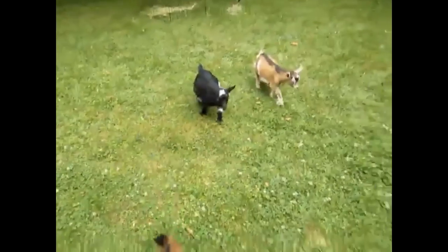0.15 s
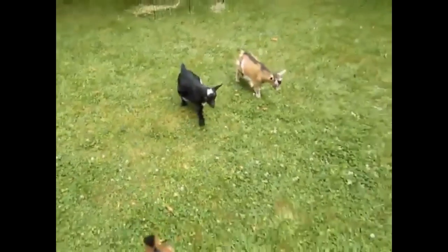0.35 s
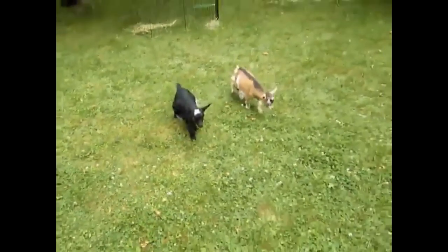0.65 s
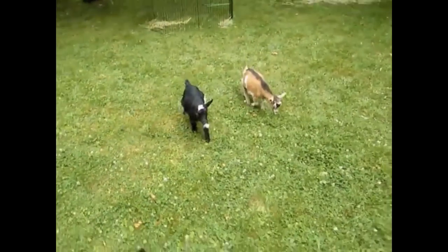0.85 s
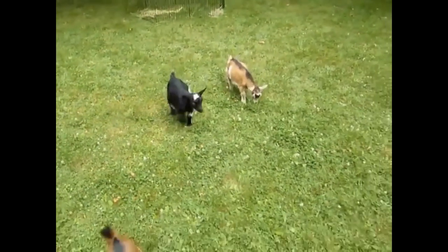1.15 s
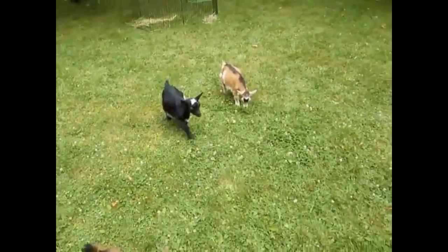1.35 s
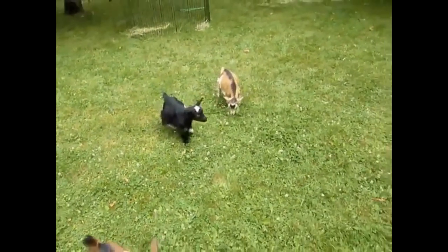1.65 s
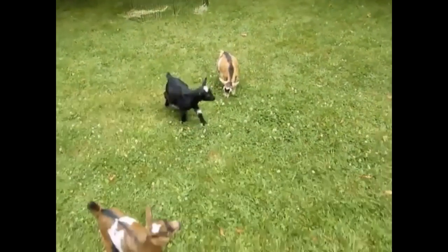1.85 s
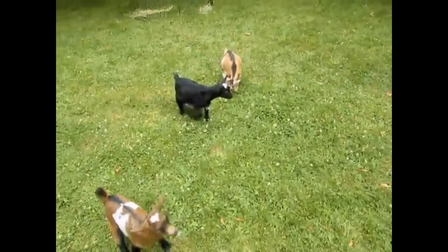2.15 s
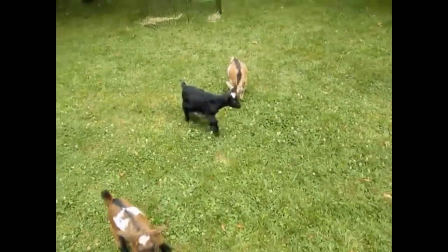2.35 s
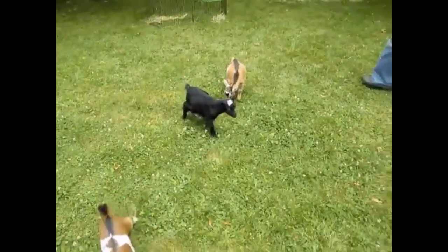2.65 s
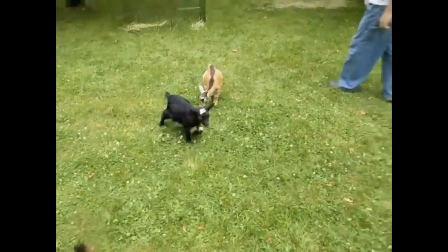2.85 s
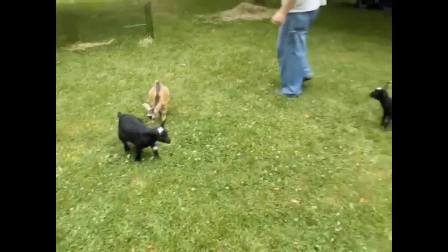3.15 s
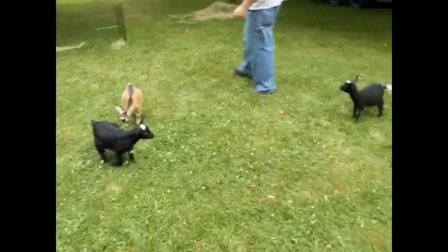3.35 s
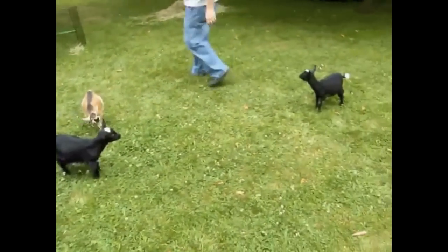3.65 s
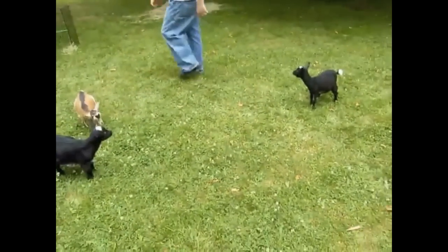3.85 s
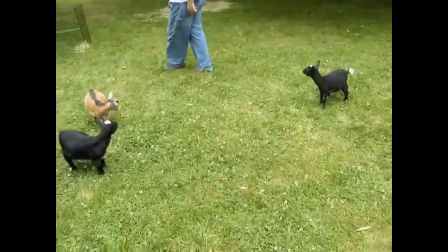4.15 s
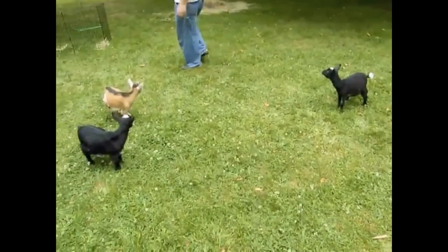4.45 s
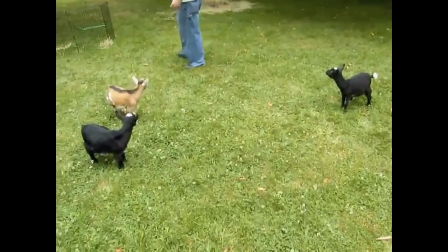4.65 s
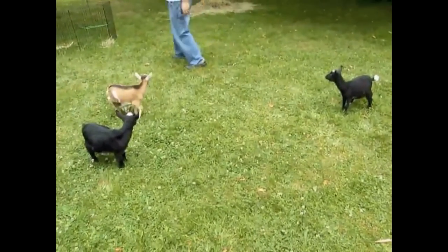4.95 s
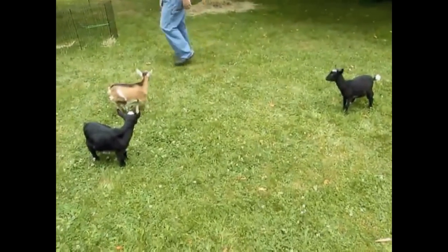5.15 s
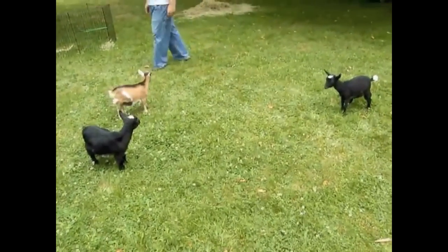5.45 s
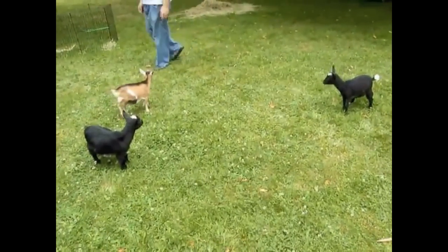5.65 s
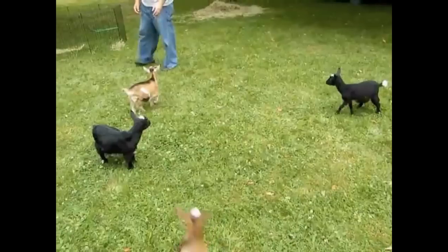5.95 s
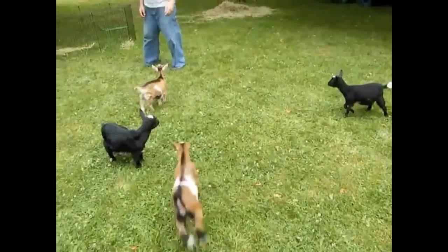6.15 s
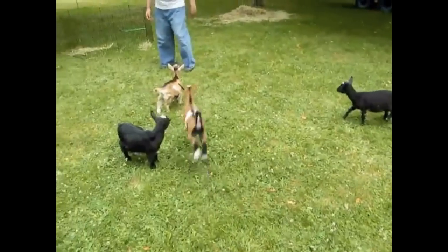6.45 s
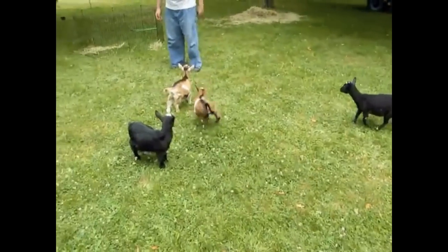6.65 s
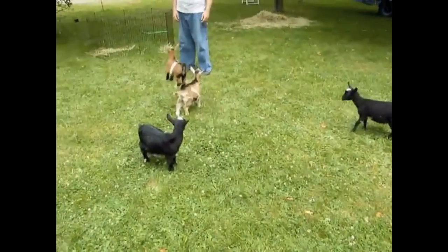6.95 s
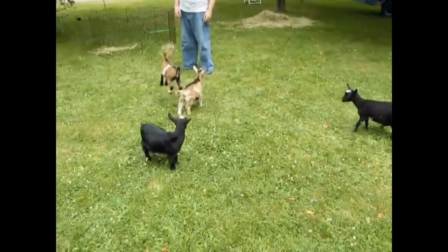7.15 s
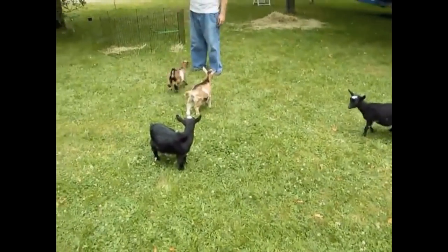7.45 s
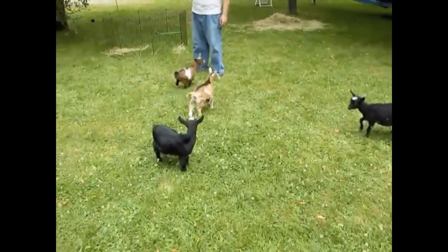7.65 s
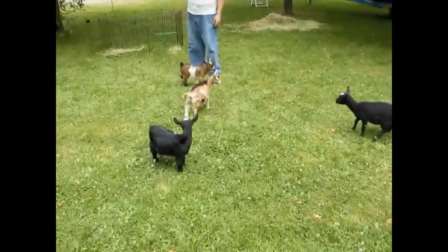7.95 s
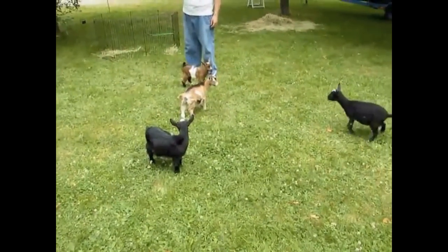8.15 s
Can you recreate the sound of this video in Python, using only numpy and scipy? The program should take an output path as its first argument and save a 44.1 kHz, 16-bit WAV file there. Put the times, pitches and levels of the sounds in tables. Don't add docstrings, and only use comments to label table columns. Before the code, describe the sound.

Goat kids in a yard bleat in quick pulsing bursts, each voice different: close and nasal, open-mouthed, thin, shrill and tight. Calls start soft, peak in the middle and end with a strong quavering bleat and two short nasal notes. Early crackles and clicks, later hoof thuds, falling bird chirps and low wind bumps surround them. The open-air sound is slightly dull and gritty, from a cheap handheld microphone, with distant engine and traffic wash.

```python
import sys
import numpy as np
from scipy import signal
from scipy.fft import rfft, irfft
from scipy.io import wavfile
from scipy.ndimage import uniform_filter1d

SR = 44100
rng = np.random.default_rng(int(sys.argv[2]) if len(sys.argv) > 2 else 0)


def master(y):
    cut = np.clip(np.atleast_2d(y).T, -1, 1)
    pcm = np.round(cut * 32767)
    wavfile.write(sys.argv[1], SR, pcm.astype(np.int16))


def invert_db(x):
    u = np.asarray(x, float) / 20
    return 10 ** u


N = 366030


def evened(x):
    return x / np.sqrt(np.mean(x ** 2) + 1e-20)


def read(points, hz):
    f, value = np.transpose(points)
    return np.interp(np.log(hz + 1), np.log(f + 1), value)


def at_time(points, s):
    return np.interp(s, *np.transpose(points))


def add(mix, s, sound):
    part = mix[max(round(s * SR), 0):][:len(sound)]
    part += sound[:len(part)]


def wobble(count, ms):
    size = max(round(ms * SR / 1000), 2)
    noise = rng.standard_normal(count)
    return evened(uniform_filter1d(uniform_filter1d(noise, size), size))


def resonate(x, hz, width):
    turn = np.exp(2j * np.pi * np.cumsum(hz * np.ones(len(x))) / SR)
    r = np.exp(-np.pi * width / SR)
    return 2 * (turn * signal.lfilter([1 - r], [1, -r], x / turn)).real


def band(x, hz, width):
    return evened(resonate(resonate(x, hz, width), hz, width))


def coloured(points, patchy_db, size=1024):
    frames = 4 * N // size + 5
    hz = np.fft.rfftfreq(size, 1 / SR)
    a, b, patches = rng.standard_normal((3, len(hz), frames))
    patches = uniform_filter1d(patches, size=20, axis=0)
    patches = evened(uniform_filter1d(patches, size=12, axis=1))
    z = (a + 1j * b) * invert_db(read(points, hz)[:, None] + patchy_db * patches)
    return evened(signal.istft(z, nperseg=size, noverlap=3 * size // 4)[1][:N])


def echoes(x, db, t60):
    t = np.arange(SR // 2) / SR
    signs = rng.choice([-1., 1.], len(t))
    sparse = (rng.random(len(t)) < .05) * (t > .006)
    taps = signs * sparse * invert_db(-60 * t / t60)
    return x + invert_db(db) * signal.fftconvolve(x, taps / np.linalg.norm(taps))[:N]


# time_s, level_db
GUSTS = [(0, -37.5), (1.04, -43.5), (1.25, -28), (1.76, -48.5), (2.19, -35.5), (2.84, -61), (3.03, -29.5),
         (3.37, -46.5), (5.99, -46.5), (6.42, -39.5), (6.66, -58), (8.3, -43.5)]
# time_s, change_db
ENGINE_LOAD = [(0, -4), (.23, -1), (1.04, -3.5), (1.25, 2), (1.76, -6.5), (2.3, -1), (3.03, 3), (3.37, -11),
               (3.6, 0), (5.52, 1), (5.99, -6), (6.7, 7), (8.3, 8)]
# time_s, change_db
STIR = [(0, 1), (.23, 6.5), (1.251, -2), (1.76, 4.5), (2.449, -0.6), (2.84, 6), (3.1, -1.5), (3.51, 4),
        (5.52, -1.5), (5.99, 5), (6.42, -1.5), (8.3, 0.5)]
# centre_hz, width_hz, level_db
DRONES = [(55.8, 12.3, 2.5), (112.2, 23, -25), (470, 17, -15), (1078, 200, -16)]
# frequency_hz, level_db (per Hz)
TRAFFIC = [(44, -33.5), (75, -4.5), (190, -17), (243, -15.5), (399, -18), (461, -15), (590, -18.5),
           (945, -16), (1470, -23), (1700, -25.5), (2210, -48), (3740, -120)]
# frequency_hz, level_db (per Hz)
HISS = [(760, -9), (1300, -23), (1830, -1), (2000, -1.5), (3210, -4), (3830, -4.5), (4370, -6.5),
        (5500, -10), (7150, -42.5), (12100, -120)]


def air():
    t = np.arange(N) / SR
    stir_db = at_time(STIR, t)
    wind_colour = [(4, -16.5), (12, -3.0), (30, -1.0), (60, -8.5), (110, -15.5), (200, -30.5), (400, -87.5)]
    wind_db = at_time(GUSTS, t) + 2.1 * wobble(N, 60)
    wind = invert_db(wind_db) * coloured(wind_colour, 1.2, size=4096)
    drones = sum(invert_db(db) * band(rng.standard_normal(N), hz, width) for hz, width, db in DRONES)
    engine = invert_db(-44 + at_time(ENGINE_LOAD, t)) * drones
    traffic_db = -44 + 0.7448 * t + 0.39 * stir_db
    traffic = invert_db(traffic_db) * coloured(TRAFFIC, 1.85, size=2048)
    leaves = invert_db(-46.5 + stir_db) * coloured(HISS, 2.3)
    return wind + engine + traffic + leaves


def low_pushes(rows, rise):
    out = np.zeros(N)
    for s, db, hz, cycles in rows:
        u = np.arange(round(2.5 * cycles / hz * SR)) / SR * hz / cycles
        swell = 2.48 * (1 - np.exp(-u / rise)) * np.exp(-2.2 * u ** 2)
        add(out, s, invert_db(db) * swell * np.sin(2 * np.pi * cycles * u * (1 - 0.038 * u)))
    return out


# start_s, peak_db, pitch_hz, length_cycles
PUFFS = [(0.004, -17.5, 50, 1.6), (2.27, -27, 52, 2.5), (2.97, -23.5, 60, 1.7), (0.081, -21, 45.5, 2.6),
         (0.255, -16.5, 51.7, 3.1), (0.43, -24, 50, 2.6), (0.521, -25.5, 51.3, 3),
         (0.794, -25.5, 53.8, 3.4), (1.107, -22.5, 47, 2.2), (1.181, -21.5, 61.9, 2.5),
         (2.011, -26, 40.4, 2.3), (2.177, -33, 53.8, 1.7), (3.007, -15, 43.1, 0.87), (3.538, -25, 50, 2.5),
         (4.848, -27, 24.6, 0.93), (6.191, -29.5, 78.1, 2.6), (6.451, -29, 56, 3.1),
         (6.542, -24, 59.2, 0.7), (7.19, -35, 59.2, 2), (7.339, -25, 61.9, 1.2), (8.035, -31, 37.4, 3.2)]


def wind_puffs():
    return low_pushes(PUFFS, rise=0.55)


# start_s, peak_db, ring_hz, fall_by_60_db_ms
TICKS = [(.046, -31, 900, 10), (.072, -21, 4500, 4), (.148, -25, 2300, 10), (.239, -20, 1170, 13),
         (3.766, -25, 1200, 8), (4.985, -23.5, 2700, 6), (.395, -19, 4100, 12), (.418, -21, 4000, 14),
         (.466, -29, 600, 14), (.736, -33, 1200, 9.1), (0.789, -21, 1040, 10), (2.525, -17.5, 930, 10),
         (2.526, -21, 1900, 6.4), (2.615, -21, 1300, 6), (3.378, -26, 2570, 6), (3.724, -24, 1200, 5.4),
         (3.975, -26, 700, 6), (3.976, -24, 2980, 10), (3.996, -26, 3300, 6)]


def ticks():
    out, t = np.zeros(N), np.arange(900) / SR
    for s, db, hz, ms in TICKS:
        ring = np.sin(2 * np.pi * hz * t) + .3 * rng.standard_normal(len(t))
        add(out, s, invert_db(db - 60000 * t / ms) * ring)
    return out


# centre_s, level_db, length_ms, centre_hz
RUBS = [(.147, -31.5, 19, 2400), (.243, -25, 13, 1130), (.28, -37, 50, 597), (.82, -36.5, 65, 1080),
        (.285, -44, 47, 1647), (.337, -32, 77, 2750), (.34, -34.5, 64, 481), (.429, -35.5, 107, 2200),
        (.44, -30.5, 43, 517), (1.052, -42.5, 136, 1800), (1.379, -43, 102, 1650), (3.978, -34, 23, 420),
        (4.001, -37.5, 82, 2710)]
# centre_s, level_db, centre_hz
SNAPS = [(0.251, -22, 1930), (0.253, -28.5, 2600), (0.258, -29.5, 5100), (1.703, -37, 4300),
         (3.338, -42, 3900), (3.351, -36, 650), (3.381, -32, 4400), (3.728, -42, 3520), (4.987, -38, 3300),
         (6.611, -36.5, 3970), (6.645, -37, 3470), (6.735, -35.5, 3580)]
# centre_s, level_db, length_ms
SWISHES = [(.375, -36, 100), (.43, -29.5, 70), (.6, -46.5, 63), (0.708, -40.5, 37), (0.802, -36, 31),
           (.869, -39.5, 93), (1.533, -39.5, 44), (1.615, -45.5, 46), (1.755, -42.5, 26), (2.101, -43, 45),
           (2.601, -45.5, 35), (3.299, -43, 45), (4.681, -45, 30), (5.81, -46, 43), (6.624, -40, 20),
           (7.372, -49.5, 57)]


def rustles():
    out = np.zeros(N)
    rubs = [(s, db, ms, hz, 0.72 * hz) for s, db, ms, hz in RUBS]
    snaps = [(s, db, 9.4, hz, 0.47 * hz) for s, db, hz in SNAPS]
    swishes = [(s, db, ms, 4100, .26 * 4100) for s, db, ms in SWISHES]
    for s, db, ms, hz, width in snaps + swishes + rubs:
        u = np.linspace(-1.5, 1.5, round(3 * ms * SR / 1000))
        sudden = u * np.where(u < 0, 1.3, .9)
        crackle = rng.standard_normal(len(u)) * invert_db(2.0 * wobble(len(u), 2.1))
        burst = band(crackle, hz, width) * .5 ** (4 * sudden ** 2)
        add(out, s - 1.5 * ms / 1000, invert_db(db) * burst)
    return out


# start_s, length_s, level_db, from_hz, to_hz
WHISTLES = [
    (0.564, 0.16, -43.5, 3380, 3380),
    (1.7, 0.13, -41.5, 2750, 2490),
    (1.822, 0.1, -41.5, 3060, 3180),
    (1.91, .05, -45.5, 2600, 2610),
    (4.435, 0.072, -42, 2400, 2380),
    (6.79, .07, -43, 3000, 2780),
    (6.895, .065, -43, 3200, 3600),
]
# start_s, length_s, level_db, from_hz, to_hz
WARBLES = [
    (2.924, 0.2, -42.5, 3390, 3264),
    (4.275, 0.13, -40, 2840, 2800),
    (6.845, .085, -42, 2650, 2750),
    (6.928, .035, -42, 3500, 2800),
    (6.95, .045, -42, 2750, 2750),
    (6.965, .035, -44, 3300, 3300),
    (8.176, 0.068, -42, 2550, 2730),
]


def far_birds():
    out = np.zeros(N)
    calls = [(row, 1) for row in WARBLES] + [(row, .4) for row in WHISTLES]
    for (s, length, db, from_hz, to_hz), shake in calls:
        hz = np.linspace(from_hz, to_hz, round(length * SR))
        count = len(hz)
        flutter, wander = .034 * wobble(count, 3.6), .018 * wobble(count, 21)
        hz = hz * (1 + shake * (flutter + wander))
        tone = np.sin(2 * np.pi * np.cumsum(hz) / SR)
        level_db = db + np.linspace(0, -5.5, count) + 2.7 * wobble(count, 17)
        add(out, s, invert_db(level_db) * tone * signal.windows.tukey(count, .4))
    return echoes(out, -0.5, 0.069)


def stack(part_db, pitch, breath, spread):
    k = np.arange(1, 17)[:, None]
    fuzz = 1 + breath * np.sqrt(k) * np.array([wobble(len(pitch), 3) for _ in k])
    waves = np.cos(2 * np.pi * k * np.cumsum(pitch) / SR - spread * k ** 2)
    return np.sqrt(2) * (invert_db(part_db) * fuzz * waves).sum(0)


USUAL_DB = -28


def syllables(rows, throat, glide_hz, glide_hz_per_db, bright_db, bright_db_per_db,
              facing=((0, 0),), lips=((0, 0),), *, arch, flat, blunt, skew, lead_db=0, early=0, outlast=1):
    out = np.zeros(N)
    k = np.arange(1, 17)[:, None]
    for s, db, ms, hz, *mouth in rows:
        effort_db = db - USUAL_DB
        glide = glide_hz + glide_hz_per_db * effort_db
        edge_db = bright_db + bright_db_per_db * effort_db + at_time(facing, s)
        u = np.linspace(-1.5, 1.5, round(3 * ms * SR / 1000))
        bent = u * (1 + skew * np.sign(u))
        sag = .28
        fall = sag * np.tanh(arch * abs(bent + early) ** flat / sag)
        pitch = (hz + glide * np.tanh(u)) * (1 - fall) * (1 + .003 * wobble(len(u), 4.8))
        upper = k * pitch > 1700
        opening = np.where(upper & (k * hz < 3200), np.prod(mouth), 1)
        part_db = read(throat, k * pitch / opening)
        part_db = part_db + (edge_db - lead_db * np.tanh(2 * u)) * upper
        part_db = part_db + at_time(lips, s) * ((k > 1) & (k < 5))
        fade_db = -6 * abs(2 * bent / np.where(k > 1, outlast, 1)) ** blunt
        voice = stack(part_db + fade_db, pitch, breath=.045, spread=.085)
        voice = voice * signal.windows.tukey(len(u), .2)
        loudest_db = max(read(throat, hz * np.arange(1, 4)))
        add(out, s - 1.5 * ms / 1000, invert_db(db - loudest_db) * voice)
    return out


def held_bleat(curve, throat, bright_db, bright_db_per_db):
    s, hz, db = np.transpose(curve)
    t = np.arange(s[0], s[-1], 1 / SR)
    pitch, level_db = (uniform_filter1d(np.interp(t, s, v), size=150) for v in (hz, db))
    k = np.arange(1, 17)[:, None]
    edge_db = bright_db + bright_db_per_db * (level_db.clip(USUAL_DB - 4) - USUAL_DB)
    part_db = read(throat, k * pitch) + edge_db * (k * pitch > 1450)
    pitch = pitch * (1 + .003 * wobble(len(t), 4.8))
    out = np.zeros(N)
    add(out, s[0], invert_db(level_db - part_db[:3].max(0)) * stack(part_db, pitch, breath=.04, spread=.1))
    return out


# centre_s, level_db, length_ms, pitch_hz, mouth_opening (factor on upper throat)
NASAL_KID = [(0.687, -28, 15, 377, 0.67), (0.808, -30.5, 22, 352.3, 0.68), (0.917, -28, 22, 370.6, 0.69),
             (2.412, -41, 26, 276, 0.73), (2.506, -34, 33, 436, 0.64), (3.502, -16, 16, 475, 1.02),
             (3.592, -14.5, 18, 478, 1.01), (3.692, -18.5, 12, 454.4, 0.93), (4.238, -19.5, 15, 419, 0.84),
             (4.329, -14, 21, 453, 0.843), (4.435, -27.5, 18, 395.6, .9), (4.729, -31.5, 12, 432, .86),
             (4.816, -29, 19, 406, 1.2), (4.906, -26.5, 19, 401, 0.97), (5.005, -13, 17, 448.7, 0.81),
             (5.103, -13.5, 22, 441, 0.85), (5.24, -32.5, 14, 376.4, 0.68), (5.349, -32.3, 20, 354, 0.73),
             (5.627, -36, 17, 334, 0.72), (5.72, -35.5, 30, 380, .82), (6.176, -26, 19, 427, 0.7),
             (6.264, -28.5, 19, 397.4, 1.16)]
# frequency_hz, gain_db
NASAL_THROAT = [(300, -7), (390, -4), (470, 0), (680, -18), (900, -14), (1350, -20), (1900, -33),
                (2400, -27), (2800, -16), (3100, -27), (3600, -22), (3950, -35), (4300, -46), (5500, -48),
                (6500, -50)]
# time_s, brightness_db
NASAL_FACING = [(.7, 5.5), (.92, 4), (2.42, -19), (2.5, 5), (3.45, 2), (3.7, 5), (4.24, -7), (4.431, 6.5),
                (4.85, -3), (5.0, 3), (5.1, 1.5), (5.25, -5), (6.18, 1.5)]
# time_s, change_db
NASAL_LIPS = [(.69, 0), (.92, -0.5), (2.42, -9), (2.5, 4), (3.5, -2), (3.59, -5), (3.69, 3.5), (4.24, 1.5),
              (4.33, -3), (4.43, 6), (4.9, -7), (5.0, 3.5), (5.1, -5), (5.24, -0.5), (6.18, 3.5)]
# time_s, pitch_hz, level_db
JOINED_BLEAT = [(3.374, 400, -50), (3.381, 424, -32), (3.392, 440, -27.5), (3.404, 435.5, -31.5),
                (3.417, 479, -22), (3.425, 465, -26), (3.434, 420, -49)]


def nasal_kid():
    apart = syllables(NASAL_KID, NASAL_THROAT, 9, -2, -1, 0.08, NASAL_FACING, NASAL_LIPS,
                      arch=.4, flat=2.5, blunt=1.92, skew=0.1965, lead_db=2, early=.15, outlast=1.27)
    return apart + held_bleat(JOINED_BLEAT, NASAL_THROAT, 8, -1.5)


# time_s, level_db (relative to the syllable)
WHEEZE = [(3.5, -33), (4.24, -22.5), (4.33, -37), (4.9, -25), (5.0, -17), (5.1, -31.5), (6.26, -15.5)]


def wheeze():
    out = np.zeros(N)
    for s, db, ms, *_ in NASAL_KID:
        u = np.linspace(-1, 1, round(2 * ms * SR / 1000))
        whistle = band(rng.standard_normal(len(u)), 5500, 560)
        add(out, s - ms / 1000, invert_db(db + at_time(WHEEZE, s)) * whistle * np.cos(np.pi * u / 2) ** 2)
    return out


# start_s, level_db, from_hz, to_hz
CHIRPS = [(1.118, -45.5, 4420, 3320), (1.237, -44.5, 4420, 3300), (1.344, -47, 4300, 3300),
          (1.44, -47, 5000, 3300), (2.8, -42, 4900, 3970), (2.918, -45.5, 4860, 3990),
          (3.032, -45.5, 4620, 3740), (3.156, -45, 4550, 3500), (3.255, -54, 4820, 4170),
          (4.396, -43.5, 4760, 3640), (4.525, -40, 4440, 3570), (4.642, -46.5, 4480, 3300),
          (5.565, -47.5, 3970, 3280), (6.191, -46.5, 4290, 3200), (6.305, -48, 3980, 3300),
          (6.415, -52, 4300, 3300), (7.47, -45.5, 5150, 3750), (7.582, -45.5, 5200, 3800),
          (7.693, -43, 4980, 3850), (7.82, -41, 4680, 3890), (7.9, -49.5, 4420, 3760),
          (8.037, -43, 3650, 2830), (8.127, -47, 4530, 3800), (8.148, -42.5, 3620, 2920)]


def chirps():
    out = np.zeros(N)
    for s, db, from_hz, to_hz in CHIRPS:
        u = np.linspace(0, 1, round((from_hz - to_hz) / 34000 * SR))
        hz = from_hz + (to_hz - from_hz) * u
        swell = np.sqrt(2) * np.sin(np.pi * u) ** 0.61
        level_db = db + 1.8 * wobble(len(u), 4.6)
        add(out, s, invert_db(level_db) * swell * np.sin(2 * np.pi * np.cumsum(hz) / SR))
    return echoes(out, -8, 0.5)


# centre_s, level_db, length_ms, pitch_hz, mouth_opening (factor)
OPEN_KID = [
    (2.589, -38.5, 24.6, 487, 0.71),
    (2.67, -35.5, 23.3, 532, 0.73),
    (2.754, -35.5, 32.4, 526, 0.67),
    (2.838, -39.5, 27.7, 527, 0.65),
    (2.933, -37.5, 33.25, 520, 0.79),
    (3.03, -43, 40.3, 523, 0.73),
    (5.815, -36.5, 23.96, 478.6, 0.64),
    (5.893, -38.5, 33.9, 522, 1),
]
# frequency_hz, gain_db
CALM_THROAT = [(500, -10), (800, -0.5), (1060, 0), (1300, -7.5), (1650, -23), (2200, -22.5), (2700, -11.5),
               (3300, -23), (3900, -34), (4900, -36.5), (6500, -40)]
# time_s, pitch_hz, level_db
HELD_BLEAT = [(5.944, 566, -48), (5.968, 541.3, -24), (5.984, 519.5, -21), (5.993, 513.3, -30),
              (6.001, 420.6, -35.5), (6.006, 395, -30), (6.019, 409.6, -35), (6.027, 502.6, -31),
              (6.032, 571.5, -22), (6.05, 547, -13.5), (6.066, 547, -17.5), (6.072, 518.4, -24.5),
              (6.08, 447, -36), (6.087, 405, -29), (6.1, 376.6, -29.5), (6.114, 389.5, -29),
              (6.123, 498.5, -35), (6.128, 549, -20), (6.138, 545, -17.5), (6.159, 539, -17.5),
              (6.167, 523, -31), (6.179, 409.6, -31.5), (6.198, 413, -39), (6.215, 407, -55)]
# frequency_hz, gain_db
OPEN_THROAT = [(500, -25), (800, -10), (1100, 1.5), (1300, -6.5), (1650, -26), (2200, -21), (2700, -18),
               (3300, -27), (3900, -30), (4400, -28.5), (4900, -29), (5500, -33), (6500, -45.5)]


def open_kid():
    calm = syllables(OPEN_KID, CALM_THROAT, -3.5, -2, 5, -0.6, arch=1.8, flat=4.5, blunt=3.6, skew=0.055)
    return calm + held_bleat(HELD_BLEAT, OPEN_THROAT, 5, -0.13)


# start_s, peak_db, pitch_hz, length_cycles
THUDS = [
    (3.029, -20, 88, 1.6),
    (3.977, -34.5, 273, 4.6),
    (6.942, -29.5, 252, 5.9),
    (6.987, -29.5, 97, 6.8),
    (7.348, -25, 109, 0.74),
    (7.398, -29.5, 125, 2.2),
    (7.91, -23.5, 234, 4.4),
]


def hoof_thuds():
    return low_pushes(THUDS, rise=0.11)


# centre_s, level_db, length_ms, pitch_hz, mouth_opening (factor)
THIN_KID = [
    (3.463, -43.5, 30.05, 505, 1),
    (3.559, -33, 34, 470, 1),
    (3.668, -38, 32.04, 436, 1),
]
# frequency_hz, gain_db
THIN_THROAT = [(470, -22), (930, 0), (1400, -14), (1900, -3), (2350, 0), (2800, -11), (3300, -9),
               (3800, -3), (4300, -12), (5500, -24)]


def thin_kid():
    return syllables(THIN_KID, THIN_THROAT, 45, -4, 0, 0.45, arch=1.8, flat=4.5, blunt=3.6, skew=0.055)


# centre_s, level_db, length_ms, pitch_hz, mouth_opening (factor)
SHRILL_KID = [
    (3.795, -27, 33.35, 448.4),
    (3.908, -29, 37.8, 434),
    (4.022, -36.5, 42.33, 395),
    (4.799, -32, 29, 452, .95),
    (4.922, -30.5, 24, 430),
]
# frequency_hz, gain_db
SHRILL_THROAT = [(400, -31), (880, -11), (1320, -4), (1750, -20.5), (2200, -16.5), (2650, -11.5),
                 (3100, -18.5), (3700, -9.5), (4100, -8.5), (4600, -14), (5050, -4.5), (5500, -12.5),
                 (6800, -18)]


def shrill_kid():
    return syllables(SHRILL_KID, SHRILL_THROAT, 21, 0.9, -2.5, 0.2, arch=0.34, flat=1.9, blunt=3.15, skew=.3)


def scene():
    goats = nasal_kid() + wheeze() + open_kid() + thin_kid() + shrill_kid()
    ground = wind_puffs() + ticks() + rustles() + hoof_thuds()
    birds = far_birds() + chirps()
    return (air() + ground + birds + echoes(goats, -11.5, 0.045))[None]


# frequency_hz, gain_db
PLAYBACK = [(3500, -1.5), (5000, 0.5), (5600, -2.5), (6000, -9.5), (6500, -23.5), (6900, -38),
            (7100, -52.5), (7600, -81)]


def slow_sampler(dry):
    taken = signal.oaconvolve(dry, signal.firwin(41, 5700, fs=SR)[None], "same")
    held = 4 * taken * (np.arange(N) % 4 == 0)
    return irfft(rfft(held) * invert_db(read(PLAYBACK, np.fft.rfftfreq(N, 1 / SR))), N)


def low_pass(x):
    return signal.sosfilt(signal.butter(12, 7140, fs=SR, output="sos"), x)


def record(dry):
    mix = slow_sampler(dry) - .0037
    return low_pass(mix)


dry = scene()
out = record(dry)
master(out)
```